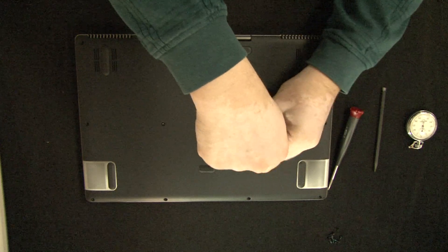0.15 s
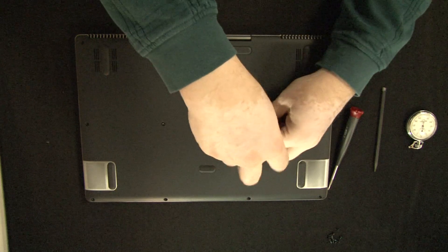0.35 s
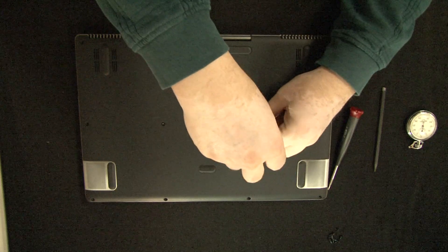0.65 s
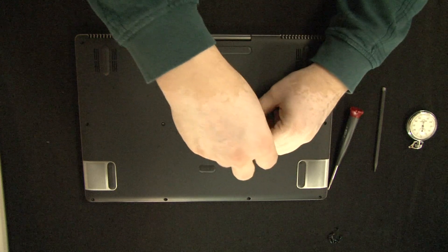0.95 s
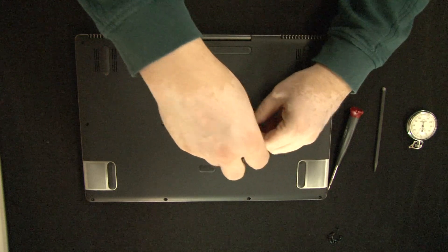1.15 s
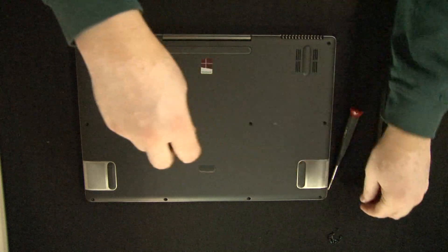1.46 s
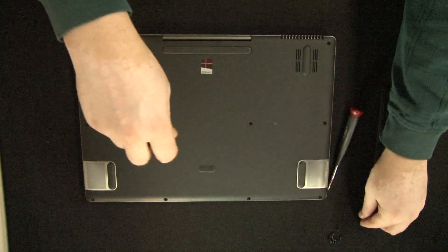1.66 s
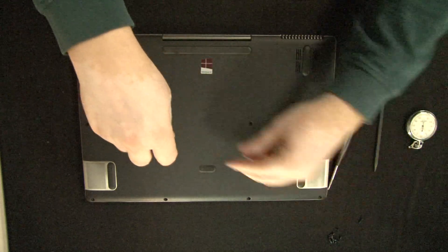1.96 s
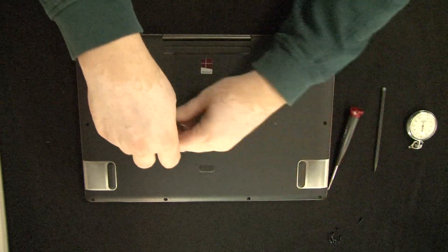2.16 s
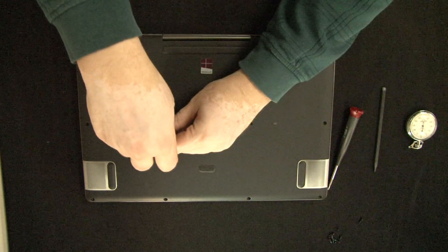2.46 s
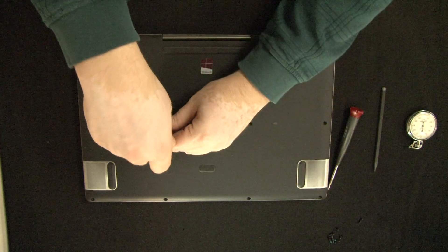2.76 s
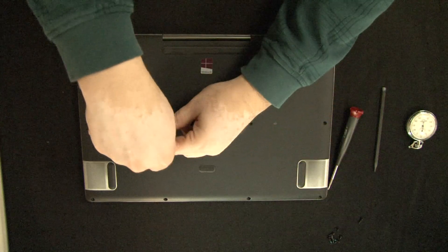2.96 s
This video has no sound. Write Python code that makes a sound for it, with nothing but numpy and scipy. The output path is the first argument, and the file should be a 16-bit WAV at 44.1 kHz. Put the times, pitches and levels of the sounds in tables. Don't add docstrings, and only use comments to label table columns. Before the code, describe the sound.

Dry plastic knocks and tiny steel clicks as a screwdriver loosens screws from a laptop base

```python
import sys
import numpy as np
from scipy import signal
from scipy.fft import rfft, irfft
from scipy.io import wavfile

SR = 44100
rng = np.random.default_rng(int(sys.argv[2]) if len(sys.argv) > 2 else 0)


def wav_record(signal):
    frames = np.transpose(np.atleast_2d(signal))
    bounded = np.clip(frames, -1, 1)
    quanta = np.round(bounded * 32767).astype(np.int16)
    wavfile.write(sys.argv[1], SR, quanta)


def invert_db(level):
    return 10 ** (np.asarray(level, dtype=float) / 20)


N = 136710

# (frequency [Hz], level struck at the corner [dB], level struck in the middle [dB],
# decay t60 [s])
PANEL_MODES = [(355.4, -7.5, -4, 0.048), (438.5, -0.5, -7.5, 0.042), (540, -14, -4.5, 0.041),
               (578, -8, 1.5, 0.016), (836, -4.5, 0, 0.057), (1042, -18, -7, 0.052),
               (1136, -6.5, 4.5, 0.0088), (1278, 9.5, 2, 0.019), (1554, -3, 3, 0.014),
               (2012, -5.5, -4.5, 0.036), (2586, -5, -5, 0.024), (3035, -5, -4.5, 0.0095),
               (3460, -7, -5, 0.017), (4300, -45, -2.5, 0.013)]
# (frequency [Hz], level [dB])
STEEL_MODES = [(1500, 12.5), (2150, 12), (2550, 8.5), (2900, -1.5), (3650, 8), (4400, -0.5), (5150, 6.5),
               (5600, -1.5), (6500, -2.5), (7700, -12), (9100, -4.5), (9900, -18), (11200, -15.5),
               (13000, -17)]
STEEL_T60_S = 0.013
PANEL_SPLIT, STEEL_SPLIT = 0.045, 0.057
RISE_S = 0.00058
PANEL_EDGE_HZ, STEEL_EDGE_HZ = 126, 190


def decay(t, t60):
    return np.exp(-np.log(1000) * t / t60)


def rms_one(x):
    return x / np.sqrt(np.mean(x ** 2) + 1e-20)


def peak_one(x):
    return x / np.abs(x).max()


def band(x, low_hz, high_hz):
    return signal.sosfilt(signal.butter(2, [low_hz, high_hz], "band", fs=SR, output="sos"), x)


def above(x, edge_hz):
    return signal.sosfilt(signal.butter(4, edge_hz, "high", fs=SR, output="sos"), x)


def add(out, s, db, sound):
    i = max(int(s * SR), 0)
    part = sound[:N - i]
    out[i:i + len(part)] += part * invert_db(db) / np.abs(sound).max()


def ringing(hz, db, t60, split, rise_s, size):
    t = np.arange(size)[:, None] / SR
    count = len(hz)
    hz = np.tile(hz, 3) * (1 + split * rng.uniform(-1, 1, 3 * count))
    db = np.tile(db, 3) + 4 * rng.standard_normal(3 * count)
    cycles = np.arange(count) / 2 + rng.random(count) / 4
    envelope = decay(t, np.maximum(np.tile(t60, 3), 1e-3)) * (1 - np.exp(-t / rise_s))
    sines = np.sin(2 * np.pi * (hz * t + np.tile(cycles, 3)))
    return (invert_db(db) * sines * envelope).sum(axis=1)


def click(size, t60, low_hz):
    burst = rng.standard_normal(size) * decay(np.arange(size) / SR, t60)
    return band(burst, low_hz, 6500)


def contact(length_s, count):
    when, size = rng.random(count), rng.uniform(-2.11, 1, count)
    out = np.zeros(SR // 50)
    out[0] = 1
    place = np.clip((when * length_s * SR).astype(int), 0, len(out) - 1)
    np.add.at(out, place, size * (1 - when / 2))
    return out


def knocks(table, column):
    out, modes = np.zeros(N), np.array(PANEL_MODES)
    hz, t60 = modes[:, 0], modes[:, -1]
    size = SR // 14
    soft = signal.butter(1, 5140, fs=SR)
    for s, db, bass_db, treble_db, *middle_db in table:
        level = modes[:, column] + bass_db * (hz < 700) + treble_db * (hz > 1700)
        level = level + sum(middle_db) * (hz > 1100) * (hz < 1700)
        body = ringing(hz, level, t60, PANEL_SPLIT, RISE_S, size)
        snap = ringing(hz, level - 1.5, t60 * 0.11, 2 * PANEL_SPLIT, RISE_S, size)
        body = signal.lfilter(*soft, body + snap)
        crack = signal.lfilter(*soft, band(rng.standard_normal(size), 2200, 5730))
        crack = invert_db(-12.5) * crack * decay(np.arange(size) / SR, 0.026)
        crack = crack + invert_db(-22) * click(size, 0.0068, low_hz=2500)
        add(out, s, db, above(peak_one(body) + invert_db(treble_db) * crack, PANEL_EDGE_HZ))
    return out


def panel_knocks():
    # (time [s], peak level [dB], extra bass [dB], extra treble [dB])
    corner = [(.015, -23, 1.5, 6.5), (.010, -32, -18, 1), (.026, -29, -3, -9), (.058, -23, -15, 0.5),
              (.0655, -17, -21, -2.5), (.075, -28, -7, -5), (.103, -28.5, 0, -9), (.121, -33, -1, 18),
              (.130, -35, -10, 18), (.152, -25, -13, 7), (.156, -28.5, -7, -9), (.165, -31, -11, -7),
              (.1775, -16.5, 6.5, -1), (.181, -13.5, 5, 3.5), (.198, -29.5, 5, -14), (.229, -30, -13, -3),
              (.241, -32, -2, -11), (.247, -28, 0, -11), (.253, -25, 7, -12), (.2635, -17, -2, -12),
              (.270, -32, 27, 9), (.278, -23, 9.5, -17), (.287, -6.5, -16.5, -22), (.294, -14.5, -1, -0.5),
              (.300, -21, -2, -1), (.308, -39, 13, 4), (.317, -42, 11, -4), (.331, -17, -4, -6),
              (.340, -24.5, -18, 0), (.400, -29, -8, -1), (.433, -28.5, -1, -2), (.445, -26.5, 8.5, 5),
              (.451, -25.5, -1, -4), (.476, -45, 4, 2)]
    # (time [s], peak level [dB], extra bass [dB], extra treble [dB], extra 1.1-1.7 kHz [dB])
    middle = [(2.2315, -13, -2.5, -3.5, -10), (2.246, -25, 1, -3, 0), (2.261, -39, 8, 6, -13),
              (2.367, -38, 10, -4, -4), (2.377, -30.5, -16, -27, -23), (2.3838, -14.5, 2.5, 3.5, 3.5),
              (2.422, -41.5, 8, -10, -19), (2.428, -33, 5, -10, -10), (2.440, -41, -7, -2, -5),
              (2.542, -23.5, -1.5, -2, 3.5), (2.563, -23, 1.5, -2.5, -2), (2.713, -44.5, -10, 5, 14),
              (2.740, -24.5, -2, 0, 0.5), (2.747, -30.5, 10.5, 4.5, -1), (2.878, -15, 0, 0, 3)]
    return knocks(corner, column=1) + knocks(middle, column=2)


def ticks(table):
    out = np.zeros(N)
    hz, base_db = np.transpose(STEEL_MODES)
    for s, db, favour_hz, top_db in table:
        far = (np.log2(hz / favour_hz) / 0.41) ** 2
        far = np.minimum(far, 1 + 2 * (hz < favour_hz))
        level = base_db - 8.5 * far + top_db * (hz > 7000)
        body = ringing(hz, level, STEEL_T60_S + 0 * hz, STEEL_SPLIT, RISE_S / 2, size=SR // 40)
        body = peak_one(body) + invert_db(-2) * click(len(body), 0.0032, low_hz=870)
        rubbed = signal.fftconvolve(body, contact(length_s=0.003, count=10))
        add(out, s, db, above(rubbed, STEEL_EDGE_HZ))
    return out


def screw_ticks():
    # (time [s], peak level [dB], favoured pitch [Hz], extra level above 7 kHz [dB])
    turning = [(.005, -35, 5400, -5), (.010, -38, 5500, -9), (.016, -23, 5300, 17), (.023, -32, 4750, 18),
               (.049, -33, 5200, 5), (.057, -29.5, 5770, -16), (.066, -35, 5100, 6), (.083, -48, 9350, 9),
               (.101, -33.5, 3710, -3), (.120, -31.5, 3700, 15.5), (.138, -49, 4450, -5),
               (.152, -29.5, 5400, 2), (.157, -24, 3600, 19), (.162, -31, 3350, 21), (.177, -25, 2740, -4),
               (.191, -35, 3600, -8), (.197, -28, 4700, -3), (.226, -22.5, 3700, -15),
               (.230, -21, 7140, -13), (.237, -32, 4300, -8), (.253, -27, 4500, -7), (.263, -31, 4500, 0),
               (.269, -30, 3700, -2), (.272, -25.5, 5240, -8), (.2865, -18.5, 2880, 4),
               (.296, -34, 4200, -8), (.308, -33, 3820, 16), (.315, -51, 3700, -10), (.367, -52, 5500, -11),
               (.394, -33.5, 3250, 4), (.4005, -34.5, 4340, -6)]
    loose = [(.4326, -25, 4900, 13), (.4444, -31.5, 3380, 13), (.494, -39.5, 4580, 4),
             (.5183, -32, 3950, 7.5), (.523, -37, 4000, 0), (.536, -41, 3580, 20),
             (.5430, -36.5, 4300, 11.5), (.556, -42.5, 3780, 4), (.5627, -43.5, 4440, 18),
             (.580, -47, 7800, -2), (.7298, -61, 3300, -5), (.7522, -46, 4000, -5), (.761, -54, 7900, 4),
             (.775, -51, 3350, -5), (.839, -46, 3830, 16), (.849, -43.5, 3830, 4), (.859, -41, 4570, 5),
             (.865, -50, 4830, -8), (.8764, -51, 7240, 6), (.884, -57, 6000, 0), (.911, -59, 3400, 0),
             (1.015, -50, 4500, 3), (1.021, -50, 5000, 3), (1.026, -56, 3820, 9),
             (1.4304, -35.5, 4360, -14), (1.4815, -47.5, 3830, -1), (1.7634, -48.5, 4400, -5)]
    second = [(2.034, -58.5, 4000, -5), (2.128, -46.5, 2230, -15), (2.313, -44.5, 2660, -8),
              (2.328, -56, 3500, -8), (2.3842, -46, 4140, 22.5), (2.683, -50.5, 2400, -8),
              (2.767, -46, 4430, -8), (2.957, -45, 2150, -8), (3.004, -57, 7100, -10),
              (3.016, -30, 2570, -15), (3.0234, -35, 2780, -14), (3.020, -39, 2400, -10),
              (3.0395, -41, 2630, -7), (3.0505, -33, 2500, -14), (3.059, -47, 2200, 0),
              (3.068, -55, 2300, -10), (3.087, -49, 2390, -10)]
    return ticks(turning) + ticks(loose) + ticks(second)


def chatter():
    # (time [s], level [dB])
    turning = [(0, -43.5), (.03, -48), (.045, -54), (.06, -41.5), (.092, -60), (.105, -46.5), (.145, -53.5),
               (.16, -44), (.174, -46.5), (.19, -51), (.22, -48.5), (.235, -49.5), (0.273, -32.5),
               (0.283, -38), (.30, -35.5), (.326, -57), (.46, -55), (0.52, -64)]
    # (time [s], length [s], level [dB])
    scuffs = [(.0, 0.077, -54), (0.151, 0.065, -50), (0.229, .1, -47), (0.38, 0.075, -60),
              (0.506, 0.076, -54), (.72, 0.077, -57), (0.827, 0.045, -54), (1.007, 0.023, -57),
              (1.42, .08, -63), (2.988, 0.067, -57)]
    slips_per_s, spots = 3600, 4
    t = np.arange(N) / SR
    gain = invert_db(np.interp(t, *np.transpose(turning), right=-120))
    rub = np.zeros(N)
    for s, length, db in scuffs:
        rub += invert_db(db) * np.sqrt(np.clip(1 - ((t - s) / length * 2 - 1) ** 2, 0, 1))
    modes = np.array(PANEL_MODES)
    hz, steel_db = np.transpose(STEEL_MODES[2:11])
    size = SR // 40
    out = np.zeros(N)
    for spot in range(spots):
        panel_db = modes[:, 1 + spot % 2]
        panel = ringing(modes[:, 0], panel_db, modes[:, -1] * 0.17, 2 * PANEL_SPLIT, RISE_S, size)
        steel = ringing(hz, steel_db, STEEL_T60_S / 2 + 0 * hz, 2 * STEEL_SPLIT, RISE_S / 2, size)
        for body, body_db, force in ((panel, 5.5, gain), (steel, -4, gain + rub)):
            slips = rng.random(N) < slips_per_s / spots / SR
            slips = slips * invert_db(1.75 * rng.exponential(1, N)) * rng.choice([-1, 1], N)
            loudness = np.sqrt(slips_per_s / SR * 4 * np.sum(body ** 2))
            out += invert_db(body_db) * signal.fftconvolve(slips * force, body)[:N] / loudness
    return above(out, PANEL_EDGE_HZ)


def room(x):
    t60_s, gap_s, level_db = 0.25, 0.00053, -21.5
    t = np.arange(SR // 2) / SR
    tail = band(rng.standard_normal(len(t)), 410, 2900) * decay(t, t60_s)
    tail = tail * np.clip(t / gap_s - 1, 0, 1)
    return invert_db(level_db) * signal.fftconvolve(x, tail / np.sqrt(np.sum(tail ** 2)))[:N]


def room_tone():
    # (frequency [Hz], level per Hz [dB])
    air = [(15, -39), (25, -10), (49, -7.5), (138, -6), (170, -8), (306, -11), (422, -10), (3650, -27),
           (14600, -39.5)]
    # (frequency [Hz], width [Hz], level [dB])
    hums = [
        (98.5, 64, -60.5),
        (166.8, 16, -66.5),
    ]
    # (time [s], level [dB])
    swell = [(1.3, 0), (1.72, 7), (1.83, 8), (1.92, 4), (2.02, 12.5), (2.15, 5.5)]
    hz, db = np.transpose(air)
    f = np.maximum(np.arange(N // 2 + 1) * SR / N, 1)
    shape = invert_db(np.interp(np.log(f), np.log(hz), db)) * np.minimum(f / hz[0], 1) ** 2
    out = invert_db(-54) * rms_one(irfft(rfft(rng.standard_normal(N)) * shape, N))
    for hum_hz, width_hz, hum_db in hums:
        swell_db = np.interp(np.arange(N) / SR, *np.transpose(swell)) * (hum_hz > 130)
        hum = band(rng.standard_normal(N), hum_hz - width_hz / 2, hum_hz + width_hz / 2)
        out = out + invert_db(hum_db + swell_db) * rms_one(hum)
    return out


def scene():
    work = panel_knocks() + screw_ticks() + chatter()
    return (work + room(work) + room_tone())[None]


def top_cut(x):
    return signal.sosfilt(signal.butter(12, 15720, fs=SR, output="sos"), x)


def record(dry):
    mix = signal.sosfilt(signal.cheby2(14, 20, 15250, fs=SR, output="sos"), dry)
    return top_cut(mix)


dry = scene()
out = record(dry)
wav_record(out)
```